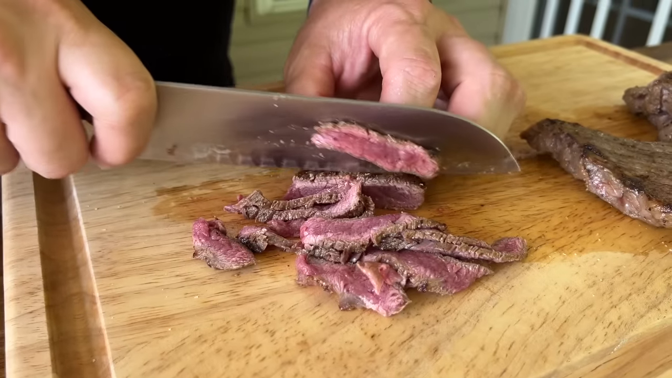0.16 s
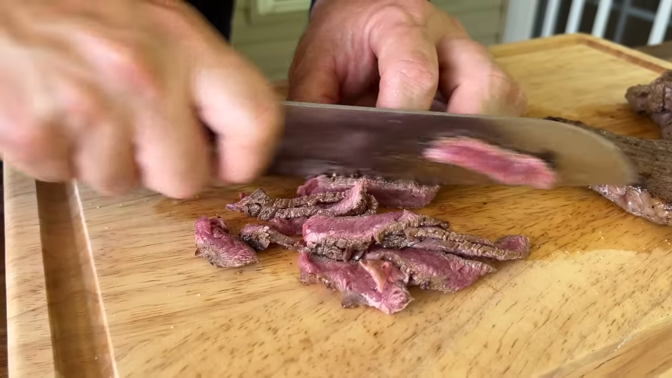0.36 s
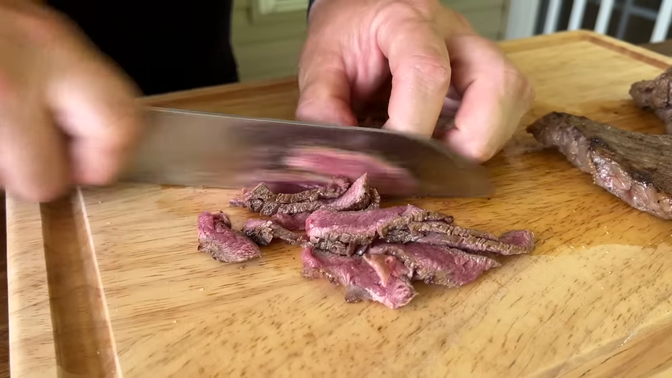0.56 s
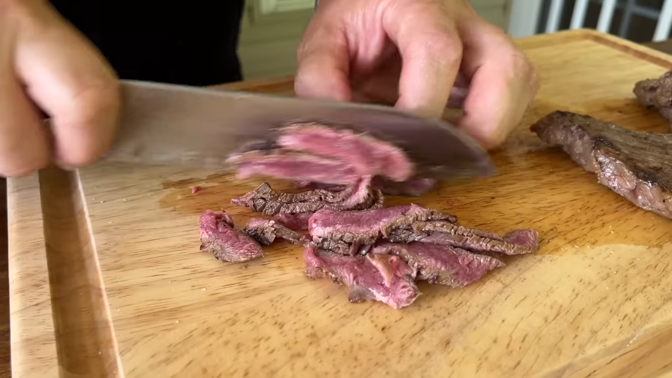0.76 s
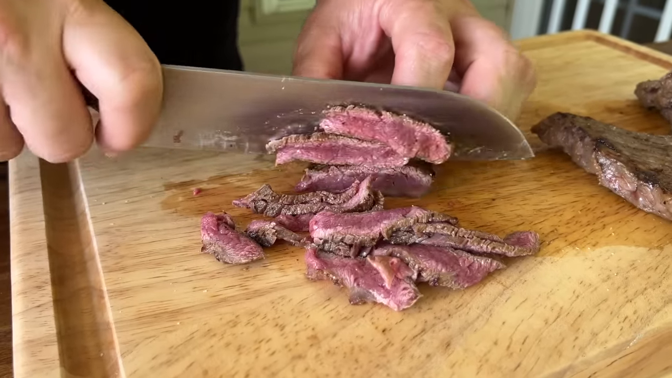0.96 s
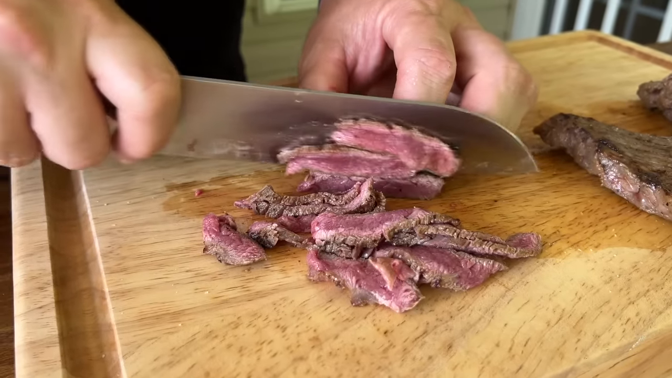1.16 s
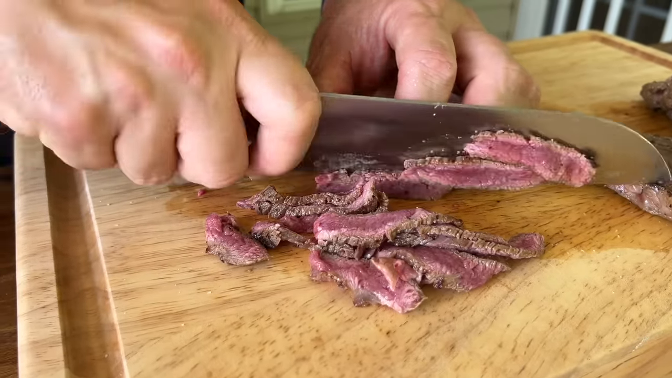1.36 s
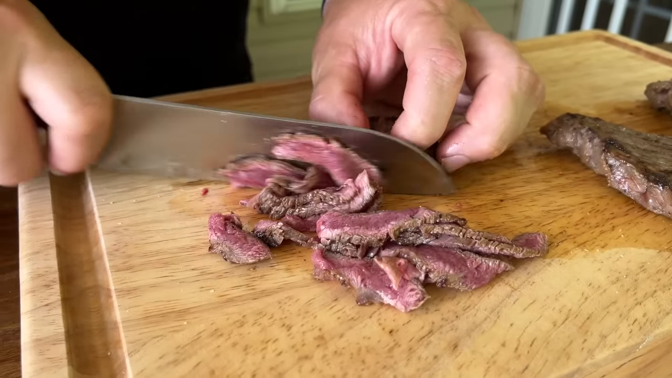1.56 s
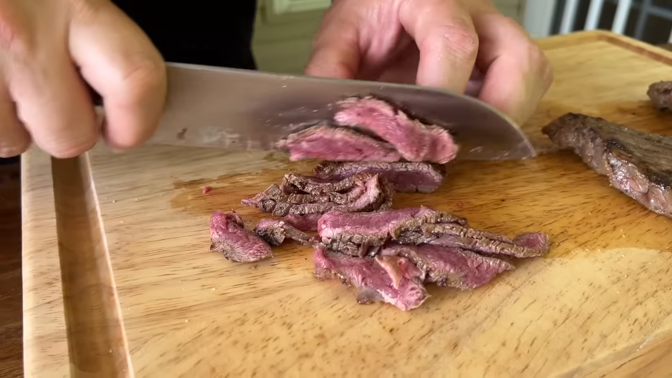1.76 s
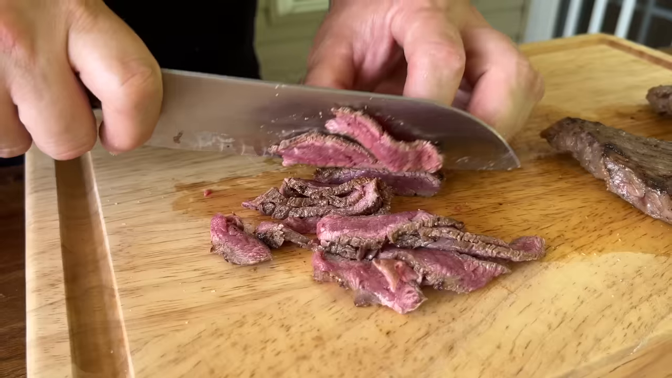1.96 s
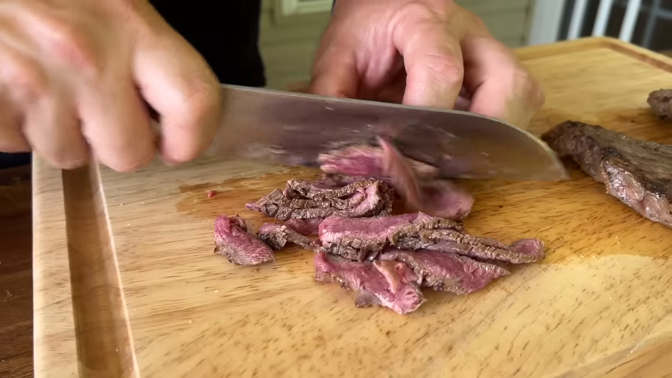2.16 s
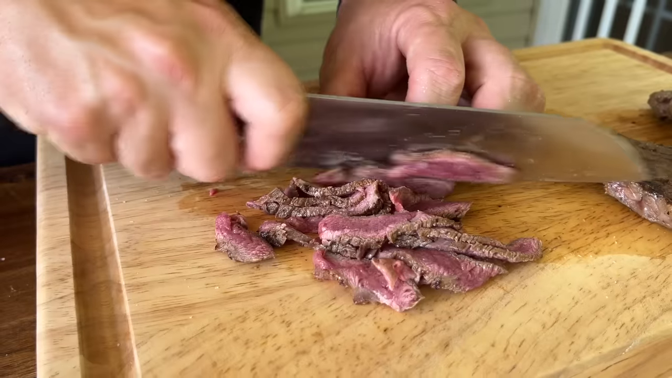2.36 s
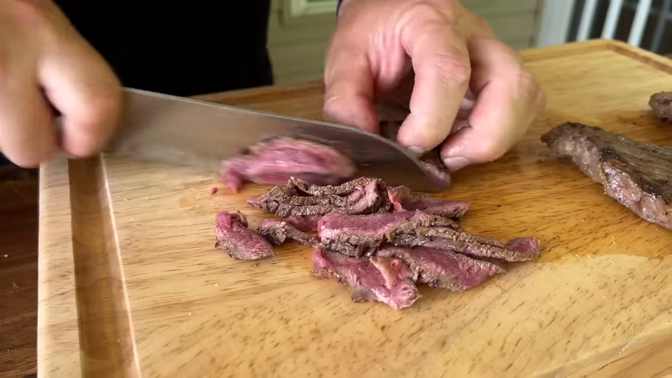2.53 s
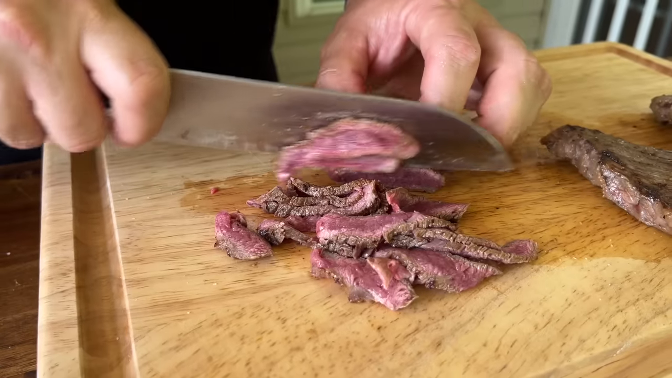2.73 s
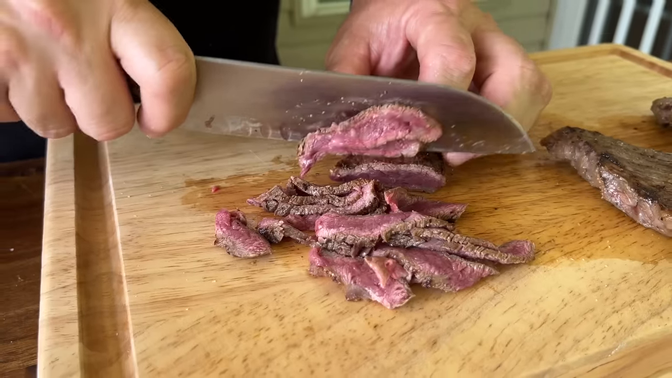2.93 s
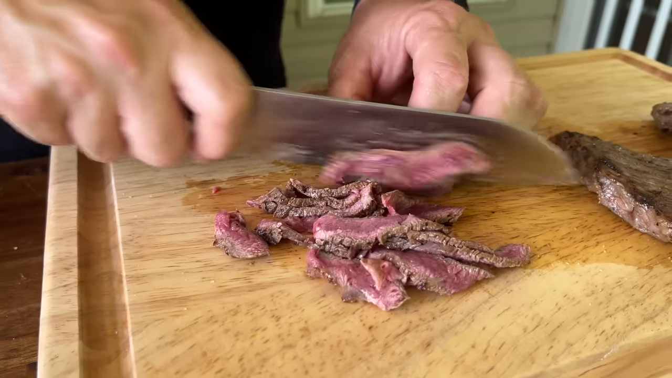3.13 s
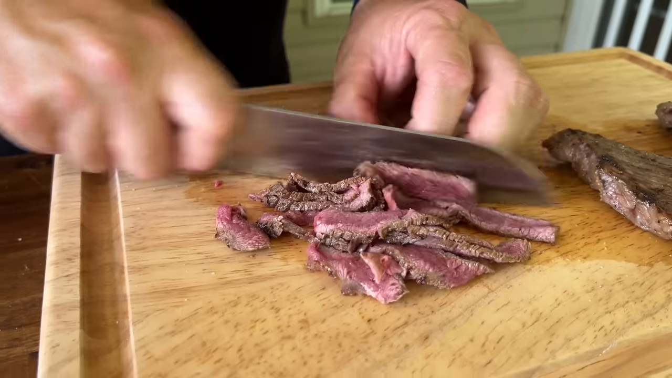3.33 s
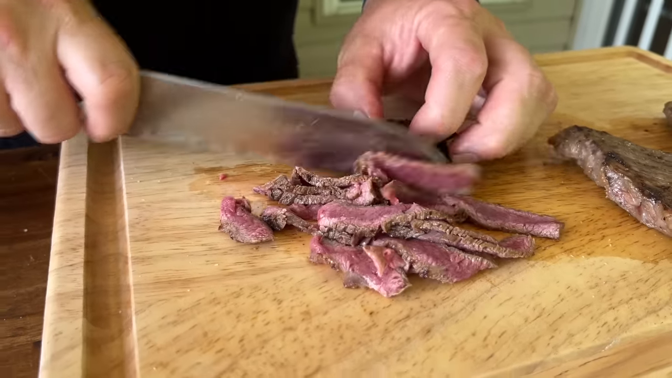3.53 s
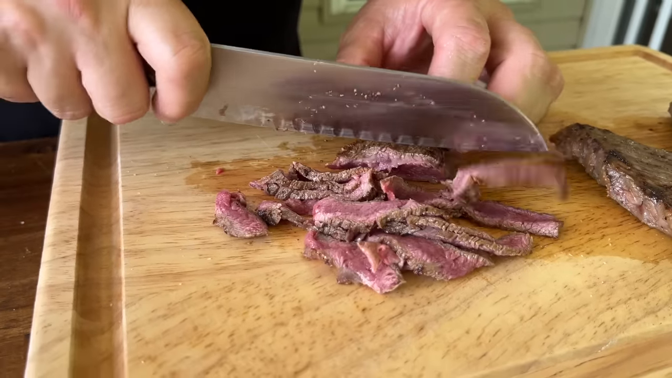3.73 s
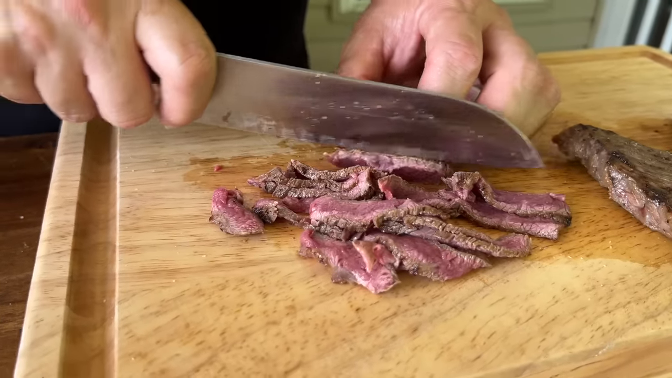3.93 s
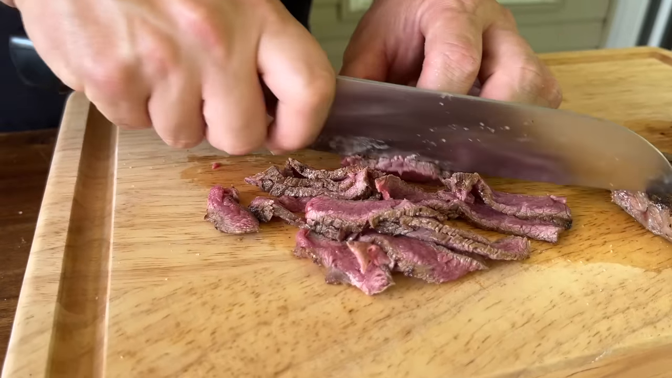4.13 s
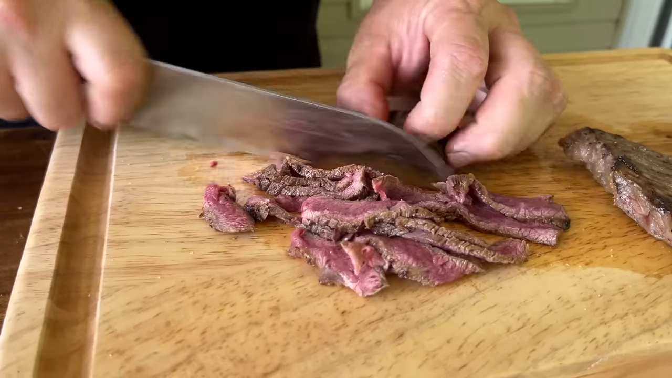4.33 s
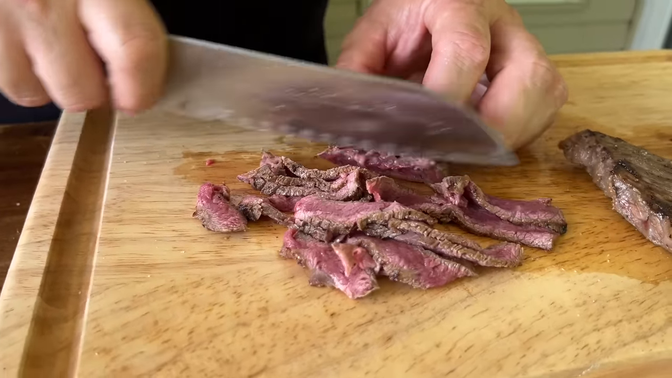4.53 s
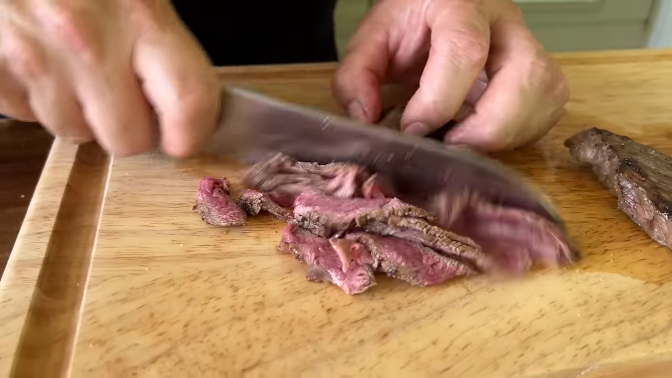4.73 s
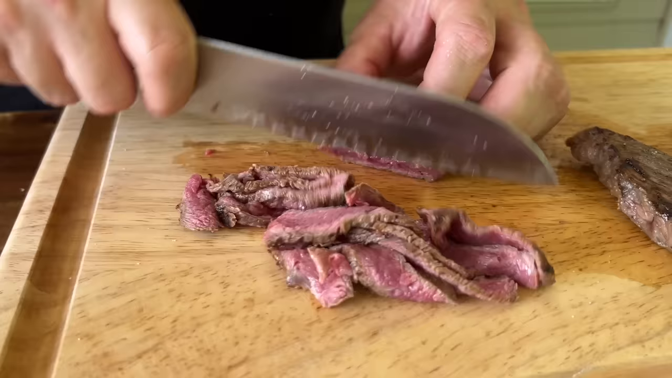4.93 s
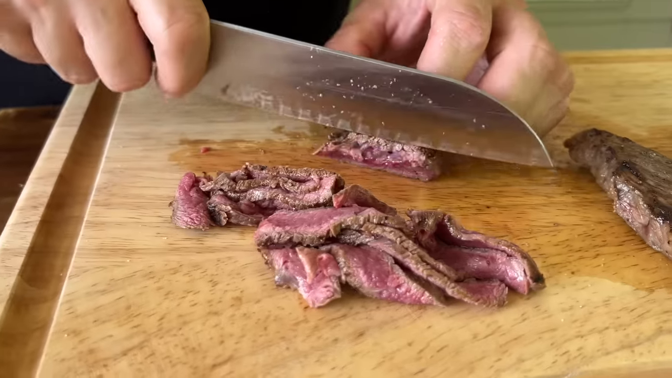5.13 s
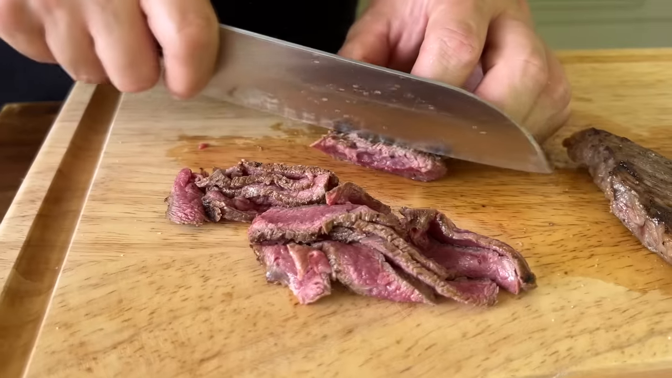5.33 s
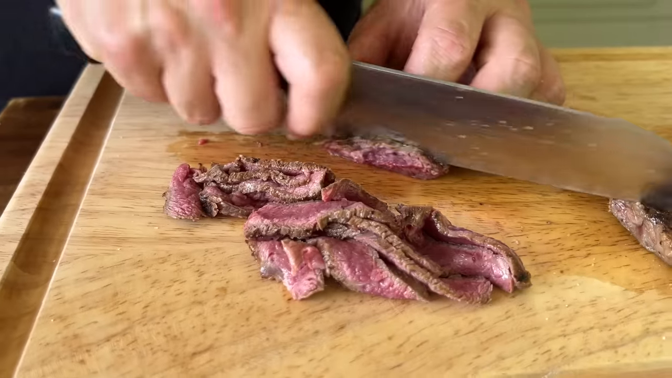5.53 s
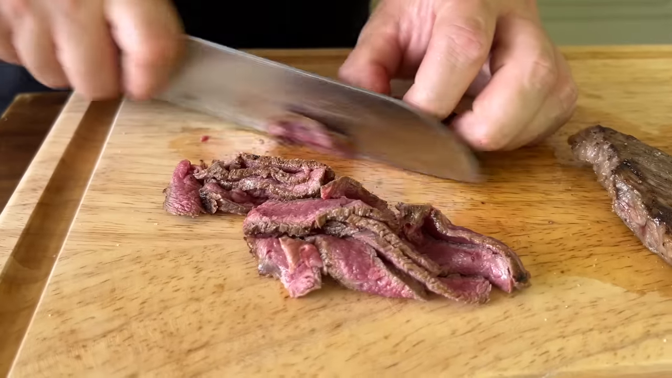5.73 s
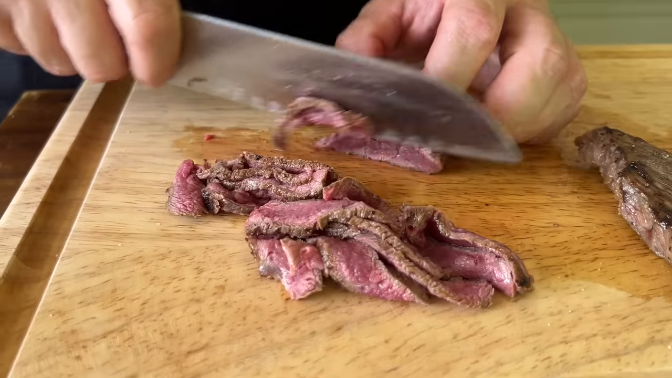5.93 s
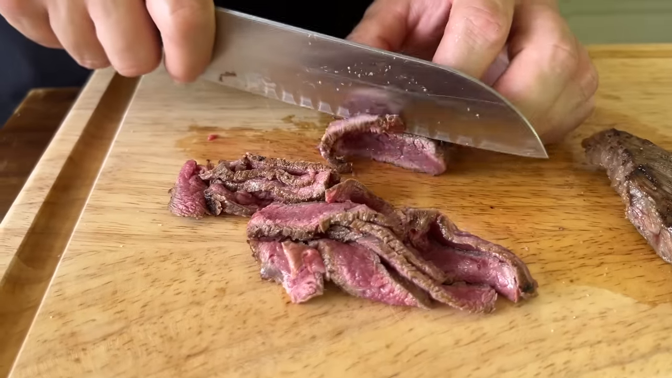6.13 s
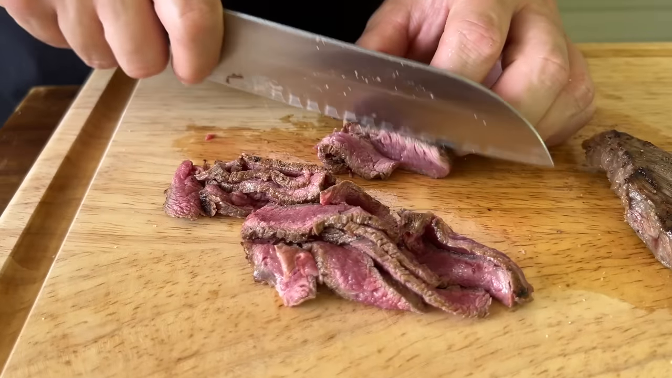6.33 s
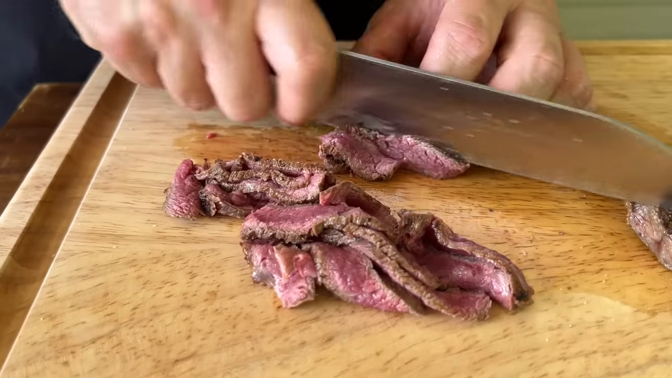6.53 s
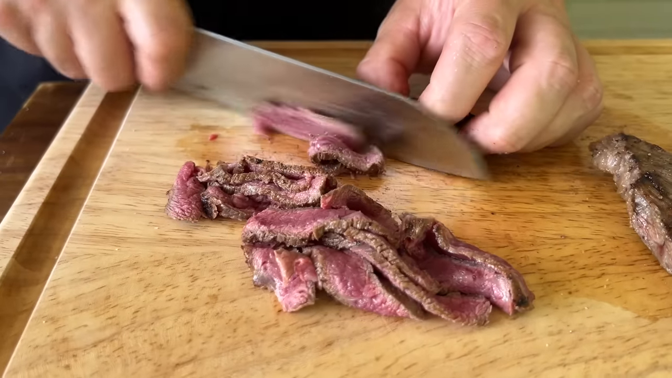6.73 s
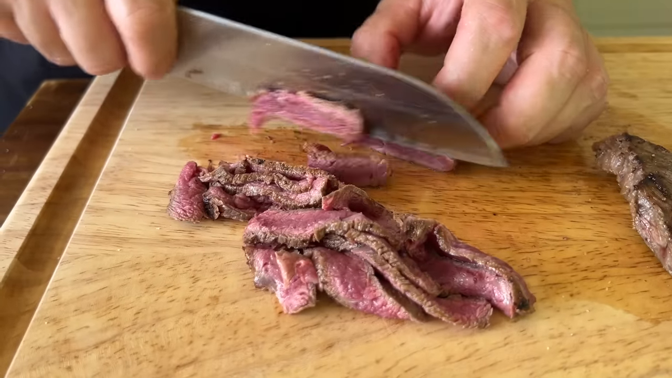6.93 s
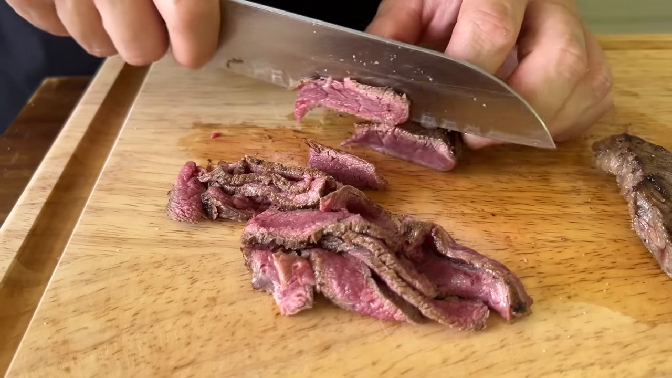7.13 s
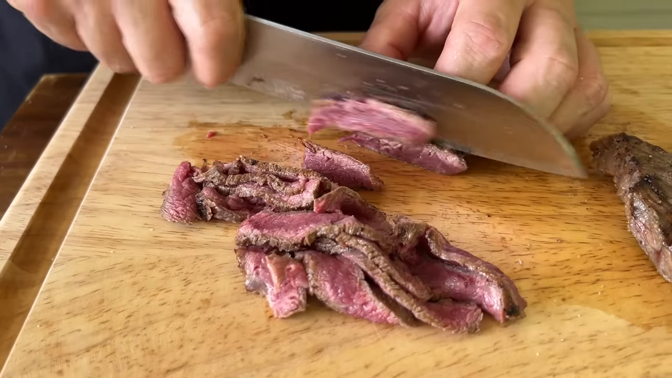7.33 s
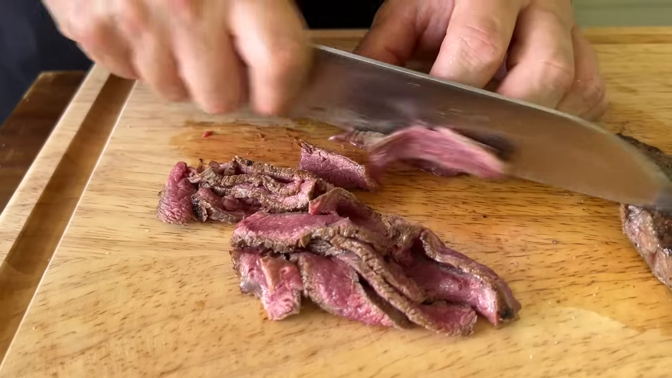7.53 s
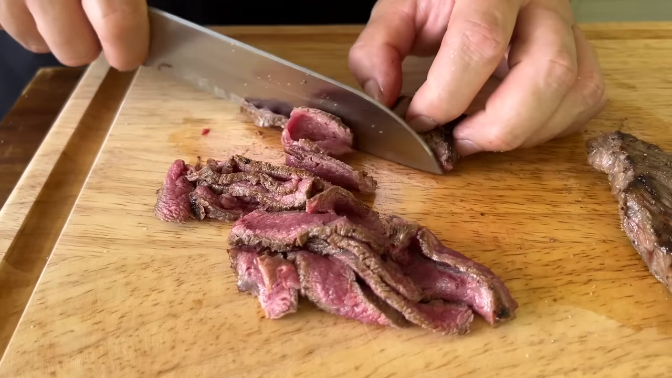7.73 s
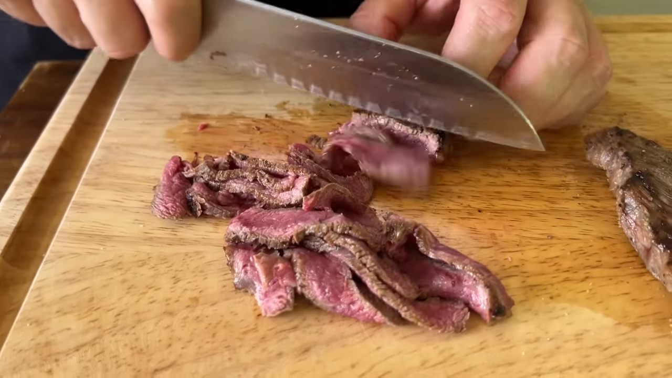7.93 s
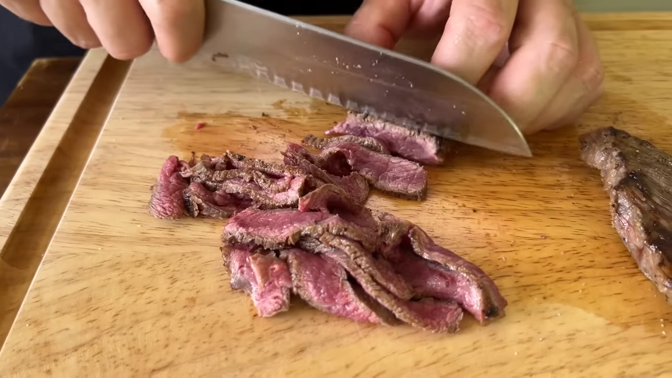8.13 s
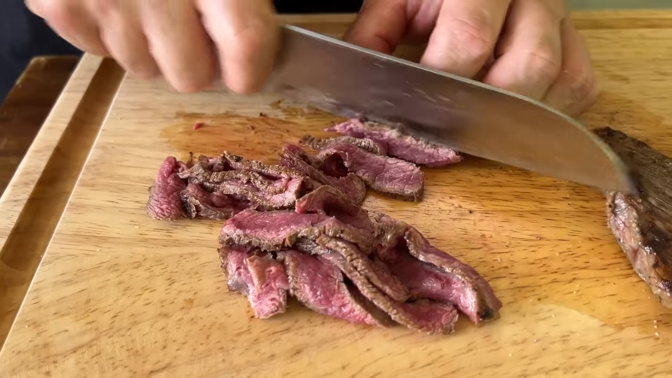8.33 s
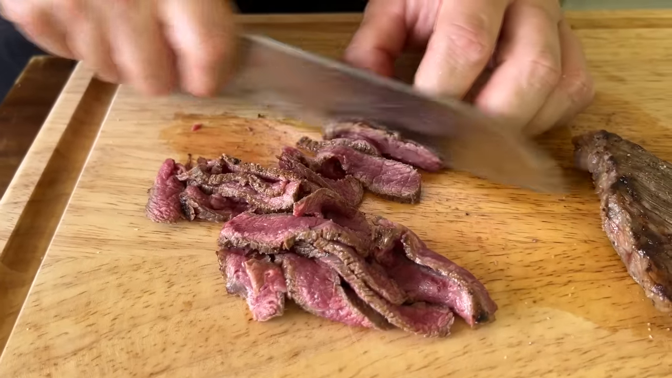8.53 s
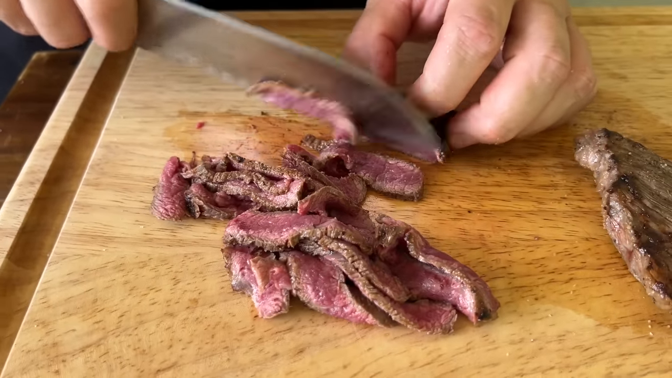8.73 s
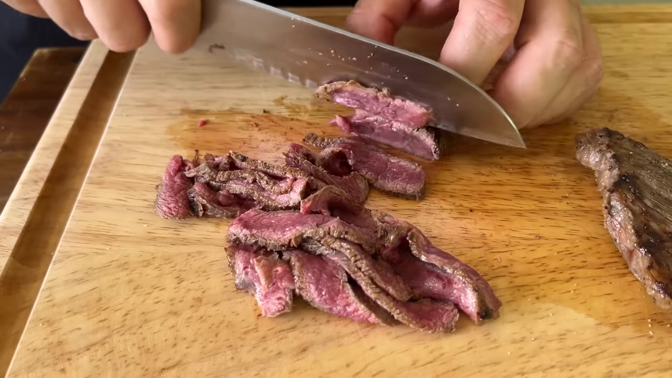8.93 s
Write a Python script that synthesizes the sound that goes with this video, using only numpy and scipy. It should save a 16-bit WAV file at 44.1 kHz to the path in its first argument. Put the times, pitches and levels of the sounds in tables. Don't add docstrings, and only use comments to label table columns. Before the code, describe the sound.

A knife cuts cooked meat on a wooden cutting board, each stroke ending in a short dull knock, roughly one per second. Midway, two firm taps come close together and the second turns into a brief ringing blade scrape. To the left a pan hisses and spits fat throughout. Close stereo microphones catch soft low air bumps and a faint distant motor hum in a kitchen-like space.

```python
import sys
import numpy as np
from scipy import signal
from scipy.fft import rfft, irfft
from scipy.io import wavfile

SR = 44100
rng = np.random.default_rng(int(sys.argv[2]) if len(sys.argv) > 2 else 0)


def amplitude_ratio(level_db):
    exponent = np.asarray(level_db, float) / 20
    return 10 ** exponent


def output_pcm(signal):
    pcm = np.clip(np.atleast_2d(signal).T, -1, 1) * 32767
    wavfile.write(sys.argv[1], SR, np.round(pcm).astype(np.int16))


N = 400428
SCRAPE_S = 4.682


def rms_one(x):
    return x / np.sqrt(np.mean(x ** 2) + 1e-20)


def in_time(rows):
    s, *columns = np.transpose(rows)
    return [np.interp(np.arange(N) / SR, s, c) for c in columns]


def on_bins(rows):
    hz, *columns = np.transpose(rows)
    bins = np.arange(N // 2 + 1) * SR / N + 1
    return [np.interp(np.log(bins), np.log(hz), c) for c in columns]


def filtered(x, order, hz, kind):
    return signal.sosfilt(signal.butter(order, hz, kind, fs=SR, output="sos"), x)


def drift(rate_hz):
    r = np.exp(-80 * np.pi * rate_hz / SR)
    slow = signal.lfilter([1], [1, -2 * r, r * r], rng.standard_normal(N // 40 + 2002))[2000:]
    return np.interp(np.arange(N) / 40, np.arange(len(slow)), rms_one(slow))


def room(x, t60, cut_hz, onset_s, side_db):
    t = np.arange(SR // 2) / SR
    walls = rng.standard_normal((2, len(t))) * amplitude_ratio(-60 * t / t60) * (1 - np.exp(-t / onset_s))
    mid, side = signal.sosfilt(signal.butter(1, cut_hz, fs=SR, output="sos"), walls)
    side = amplitude_ratio(side_db) * side
    walls = np.array([mid + side, mid - side]) / np.sqrt(np.sum(mid ** 2))
    return signal.fftconvolve(np.atleast_2d(x), walls, axes=1)[:, :N]


# time in seconds, turns per second in Hz, level of the boom in dB.
MOTOR = [(0.0, 19.6, -46.5), (1.1, 19, -47), (1.4, 19.5, -56.5), (7.5, 18.4, -59.5), (8.0, 19.55, -47.5),
         (9.08, 19, -52)]
# cycles per turn, level in dB.
MOTOR_ORDERS = [(3, -60), (5, -64), (6, -63), (8, -63), (10, -63)]


def motor():
    turns_hz, boom_db = in_time(MOTOR)
    turn = 2 * np.pi * np.cumsum(turns_hz) / SR
    hum = np.zeros(N)
    for order, level_db in MOTOR_ORDERS:
        hum += amplitude_ratio(level_db + 4.8 * drift(0.49)) * np.sin(order * turn + order ** 2)
    boom = amplitude_ratio(boom_db - 1.0) * np.sin(4 * turn - np.array([[0], [.6]]))
    return hum * amplitude_ratio(np.array([[1.5], [-1.5]])) + boom


# pitch in Hz, level in dB per Hz.
AIR_COLOUR = [(13, -28), (22, -2), (59, 7), (92, 4), (126, -6.5), (172, -14), (260, -37.5), (340, -44),
              (570, -120)]
# time in seconds, level in dB.
CALM = [(0.0, -52), (2.0, -46.5), (3.0, -48), (5.7, -48.5), (6.2, -50.5), (9.08, -50.5)]
# centre in seconds, peak in dB, half length in seconds.
PUFFS = [(.2, -51, 0.032), (0.426, -48, 0.05), (.6, -52, .08), (0.795, -54, 0.022), (1.22, -46, .05),
         (1.439, -26.5, 0.048), (1.607, -46, 0.072), (1.823, -29, 0.037), (2.471, -41, 0.047),
         (2.65, -46, 0.041), (2.982, -44, 0.019), (3.343, -38, 0.028), (3.515, -38, 0.03),
         (3.83, -40, .045), (4.122, -39, .07), (4.27, -37, .03), (4.487, -26.5, 0.042), (4.568, -30, .06),
         (4.66, -29, 0.038), (4.745, -26, 0.032), (5.16, -40.5, 0.076), (5.275, -42, 0.051),
         (5.52, -33, 0.076), (5.683, -31.5, 0.019), (5.763, -42, 0.023), (6.676, -42, 0.031),
         (7.108, -42, 0.038), (7.62, -35, 0.025), (7.903, -42, 0.029)]


def air():
    (calm_db,), (colour_db,) = in_time(CALM), on_bins(AIR_COLOUR)
    t = np.arange(N) / SR
    level = amplitude_ratio(calm_db)
    for s, peak_db, half_s in PUFFS:
        level = level + amplitude_ratio(peak_db) * np.exp(-((t - s) / half_s) ** 2)
    mid, side = rms_one(irfft(rfft(rng.standard_normal((2, N))) * amplitude_ratio(colour_db), N))
    return level * amplitude_ratio(2.0 * drift(13.4)) * (mid + amplitude_ratio(-10) * side * np.array([[1], [-1]]))


# start in seconds, end in seconds, pitch in Hz, level in dB rms.
WHISTLE = (6.36, 6.44, 3160, -51)


def whistle():
    start, end, hz, level_db = WHISTLE
    t = np.arange(N) / SR
    swell = np.sin(np.pi * np.clip((t - start) / (end - start), 0, 1)) ** .5
    return amplitude_ratio(level_db + 3) * swell * np.sin(2 * np.pi * hz * t)


# time in seconds, hiss in dB, crackle against the hiss in dB.
FRYING = [(0.0, -46, -7), (0.4, -46.5, -7), (3.3, -46, -14.5), (3.8, -46.5, -6.5), (4.55, -46.5, -4.5),
          (6.37, -47.5, -11), (7.64, -47, -9.5), (8.39, -48, -5), (9.08, -47.5, -11.5)]
# time in seconds, peak in dB.
SPITS = [(0.021, -27.5), (0.056, -25.5), (0.2005, -23), (0.2163, -26), (0.2723, -21), (0.6736, -26),
         (1.277, -20.5), (1.572, -22.5), (1.712, -23), (1.9616, -22.5), (2.231, -27), (2.4004, -21),
         (2.6703, -26.5), (3.0889, -31), (3.1203, -23.5), (3.1798, -25.5), (3.277, -29.5), (6.429, -30),
         (3.588, -21.5), (3.6227, -26.5), (3.7192, -23), (4.372, -27), (4.3934, -26), (4.5235, -30),
         (4.79, -27), (4.836, -28.5), (4.9025, -26), (5.4071, -29), (6.853, -30), (8.9249, -29.5)]


def pan():
    hiss_db, crackle_db = in_time(FRYING)
    sizes = amplitude_ratio(7.7 * np.minimum(rng.exponential(1, N), 3.8)) * rng.choice([-1, 1], N)
    rate_hz = 400 * amplitude_ratio(4.0 * drift(8))
    crackle = filtered(sizes * (rng.random(N) < rate_hz / SR), 1, [1400, 8000], "band")
    bursts = amplitude_ratio(hiss_db + 7.5 + crackle_db) * rms_one(crackle)

    t = np.arange(SR // 40) / SR
    bubble_hz = 3240
    pop = np.sin(2 * np.pi * bubble_hz * t) * np.exp(-(t * bubble_hz / 0.92) ** 2)
    for s, peak_db in SPITS:
        spray = amplitude_ratio(-12.5 - 60 * t / 0.045) * rng.standard_normal(len(t))
        at = round((s + 0.001018) * SR)
        bursts[at:at + len(t)] += amplitude_ratio(peak_db + 8.5) * (pop + spray)

    hiss_db = hiss_db + 11.0 + 0.93 * drift(16) + 0.094 * drift(0.38)
    hiss = rng.standard_normal((2, N)) * amplitude_ratio(hiss_db)
    return hiss + [bursts + whistle(), room(bursts, 0.063, 15400, 0.0016, -63)[0]]


# pitch in Hz, lead in radians; from 9.2 to 11 kHz
LEFT_LEADS = [(0, 0), (340, .3), (2240, 6.3), (3900, 8.7), (5100, 7.1), (6100, 9.1), (7000, 6.2),
              (8800, 4.4), (9200, 3.14), (11000, 3.14), (12300, 0), (14600, 0), (15300, -2.2), (16000, -3)]


def left_lead():
    return np.interp(np.arange(N // 2 + 1) * SR / N, *np.transpose(LEFT_LEADS))


# pitch in Hz, left level in dB, right below left in dB, likeness from 0 to 1.
PORTS = [(200, 4, 1, .75), (450, -2, 2, .43), (1000, -2, 3.5, .6), (2300, -1, 1.6, .88),
         (3200, -.3, 7.6, .38), (5400, 2.7, 15.6, .24), (6700, -3, 4, .2), (8500, -2.5, 1.5, .7),
         (9200, -6, 0, .988), (10900, -8, 0, .978), (11700, -8.5, 0, .55), (12400, -10, 0, .99),
         (14700, -11, 0, .98), (15400, -13, 0, .7)]
# pitch in Hz, width in Hz, boost in dB.
PAN_RINGS = [(1400, 410, 3), (2310, 73, 4), (5400, 880, 1)]


def from_the_left(frying):
    left_db, shade_db, alike = on_bins(PORTS)
    alike = np.clip(alike, 0, 1)
    bins = np.arange(N // 2 + 1) * SR / N
    for hz, width_hz, top_db in PAN_RINGS:
        left_db = left_db + top_db / (1 + (2 * (bins - hz) / width_hz) ** 2)
    direct, walls = rfft(frying)
    right = alike * direct * np.exp(-1j * left_lead()) + np.sqrt(1 - alike ** 2) * walls
    heard = irfft([amplitude_ratio(left_db) * direct, amplitude_ratio(left_db - shade_db) * right], N)
    return filtered(heard, 2, 130, "high")


def from_the_front(x):
    treble = np.arange(N // 2 + 1) * SR / N > 7000
    return np.array([x[0], irfft(rfft(x[1]) * np.exp(-1j * left_lead() * treble), N)])


def cracks():
    out, t = np.zeros(N), np.arange(SR // 100) / SR
    for s, peak_db, hard_db, *_ in TAPS:
        at = round((s + .001) * SR)
        level_db = peak_db - 27 + .3 * (hard_db + 20) - 60 * t / 0.0067
        out[at:at + len(t)] = amplitude_ratio(level_db) * rng.standard_normal(len(t))
    return filtered(out, 2, 4000, "high")


def knock_tail():
    s, peak_db, hard_db, *_ = np.transpose(TAPS)
    blows = np.zeros(N)
    blows[np.round((s + .003) * SR).astype(int)] = amplitude_ratio(peak_db + 0.5 * (hard_db + 18.5))
    counter = filtered(blows, 2, [600, 1100], "band")
    walls = filtered(blows, 1, [480, 1250], "band")
    return amplitude_ratio(13.5) * room(counter, 0.08, 2500, 0.0024, -18) + amplitude_ratio(6.5) * room(walls, 0.28, 1640, 0.0034, -4)


# pitch in Hz, width in Hz, level in dB.
BLADE = [(3606, 37, 1), (4530, 42, -18), (6580, 40, 1), (2360, 70, -16), (7860, 330, -16),
         (10730, 230, -8.5), (14800, 110, -15), (15300, 120, -5.5)]


def scrape():
    t = np.arange(SR // 5) / SR
    start = round(SCRAPE_S * SR)
    # lengths in seconds, levels in dB
    stages_s = np.cumsum([0, .013, .023, .036, .015])
    level_db = -24.5 + np.interp(t, stages_s, [-43, -14, 0, -15, -43])
    cycles = np.cumsum(1.03 - 0.75 * t) / SR
    catches = rng.standard_normal((len(BLADE) + 1, 2, len(t))) * amplitude_ratio(2.0 * drift(120)[:len(t)])
    singing = np.zeros(len(t))
    for (hz, width_hz, peak_db), pushes in zip(BLADE, catches):
        a, b = rms_one(signal.lfilter([1], [1, -np.exp(-np.pi * 1.3 * width_hz / SR)], pushes))
        turn = 2 * np.pi * hz * cycles
        singing += amplitude_ratio(peak_db) * np.sqrt(width_hz) * (a * np.cos(turn) + b * np.sin(turn))
    rasp = filtered(catches[-1, 0], 2, 9000, "high")
    out = np.zeros(N)
    out[start:start + len(t)] = amplitude_ratio(level_db) * (rms_one(singing) + amplitude_ratio(-5.5) * rms_one(rasp))
    return out


# time in seconds, peak in dB, then hardness, thud and body in dB against the peak.
TAPS = [(0.54, -12.5, -30, -22, -33), (1.478, -14, -27.5, -20.5, -28), (2.446, -7.5, -28, -24, -30),
        (3.323, -11.5, -20.5, -17, -6.5), (4.2494, -1.5, -16.5, -17.5, -8.5),
        (4.674, -7, -20.5, -18.5, -14), (5.683, -21.5, -24.5, -17.5, -17), (6.672, -9, -27.5, -24.5, -14.5),
        (7.5922, 2.5, -18, -21.5, -11.5), (8.561, -12.5, -31, -22.5, -24), (8.319, -35, -15, -19, -8)]
# pitch in Hz, level in dB, seconds to die away by 60 dB.
BOARD = [(281, -9.5, 0.04), (374, -18, 0.034), (479, -25.5, 0.027), (620, -7, 0.014), (734.5, 5, 0.016),
         (897, -0.5, 0.023), (1050, 0, 0.02), (1180, -10.5, 0.013), (1375, -9, 0.011), (1760, -7.5, 0.014),
         (2265, -2.5, 0.0097), (2940, -15, 0.014), (3320, -10, 0.012), (4930, -25, 0.003)]
# pitch in Hz, level in dB.
FIRM_BLOW = [(2320, -18.5), (300, -19), (1160, -5.5), (3500, -25), (750, 2)]


def taps():
    out, t = np.zeros((2, N)), np.arange(SR // 8) / SR
    hz, level_db, t60 = np.transpose(BOARD)[:, :, None]
    firm_hz, firm_db = np.transpose(FIRM_BLOW)
    order = np.argsort(firm_hz)
    chance = rng.standard_normal((len(TAPS), 3, len(BOARD), 1))
    for (s, peak_db, *colour_db), (blow, left, right) in zip(TAPS, chance):
        hard_db = colour_db[0]
        contact = .0004 * amplitude_ratio(0.7 * max(firm_db[0] - hard_db - 1.5, 0))
        rise = (1 - np.exp(-t / contact * (hz / 750) ** 0.45)) ** 2 * amplitude_ratio(60 * contact / 0.013)

        twists = 0 < SCRAPE_S - s < .05
        edge_db = -35 + 0.36 * (hard_db + 19.0) + 9.5 * twists
        landing_db = 1.48 * (np.array([*colour_db, edge_db, 0]) - firm_db)
        landing_db = np.interp(np.log(hz), np.log(firm_hz[order]), landing_db[order])
        strength_db = peak_db - .6 + level_db + landing_db + 1.26 * blow

        at = round((s + 0.00163 - 0.96 * contact) * SR)
        for port, own in enumerate((left, right)):
            swing = np.sin(2 * np.pi * hz * (t - port * 5e-5) + 0.21 * own)
            ringing = amplitude_ratio(strength_db + 0.68 * own - 60 * t / t60) * rise * swing
            out[port, at:at + len(t)] -= np.sum(ringing, axis=0)
    return out * amplitude_ratio(np.array([[.4], [-.4]]))


def scene():
    blade = scrape()
    blade_walls = amplitude_ratio(-11.5) * room(blade, 0.028, 4400, 0.0018, 2.5)
    knife = taps() + knock_tail() + blade + blade_walls
    return motor() + air() + from_the_left(pan()) + cracks() + from_the_front(knife)


def band_limit(x):
    return signal.sosfilt(signal.butter(12, 16500, fs=SR, output="sos"), x)


def record(dry):
    dip = np.clip(np.abs(np.arange(N) / SR - 1.830) / .008, .1, 1)
    rounded = 1.226 * np.tanh(dry * dip / 1.376)
    top = signal.ellip(10, 1, 80, 15800, fs=SR, output="sos")
    mix = filtered(signal.sosfilt(top, rounded), 4, 36, "high")
    return band_limit(mix)


dry = scene()
out = record(dry)
output_pcm(out)
```